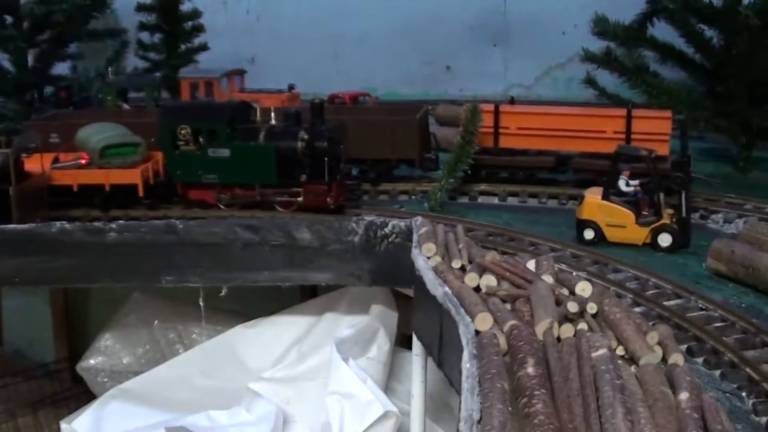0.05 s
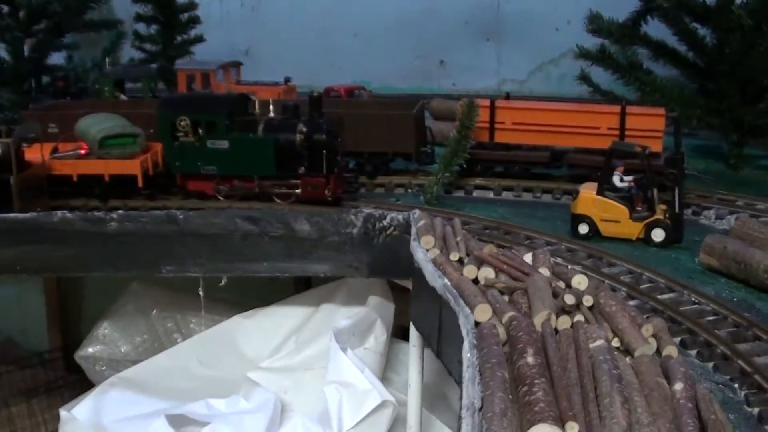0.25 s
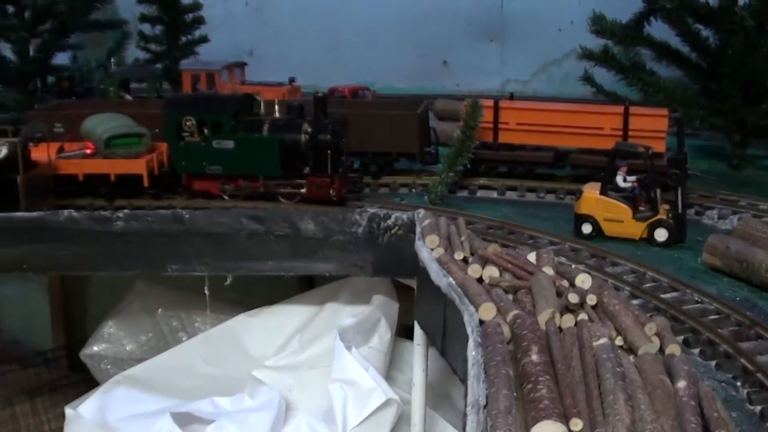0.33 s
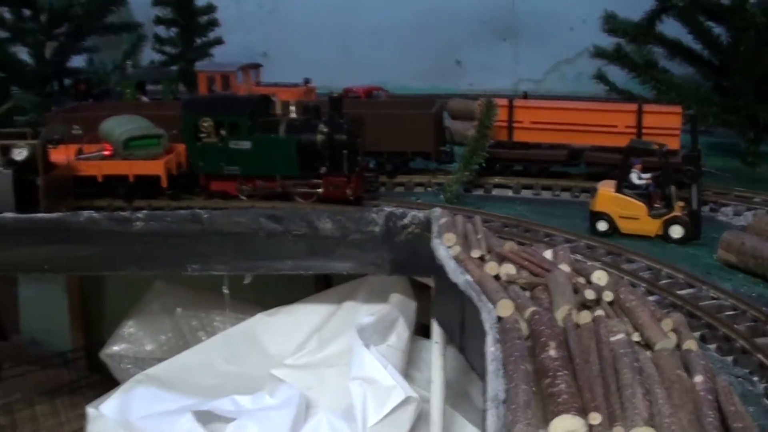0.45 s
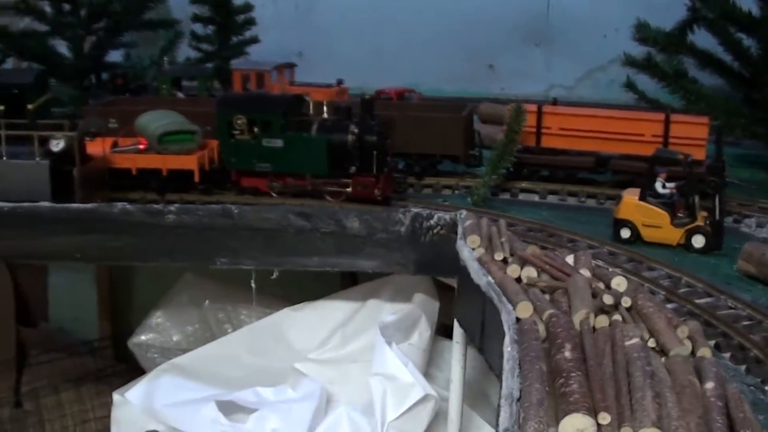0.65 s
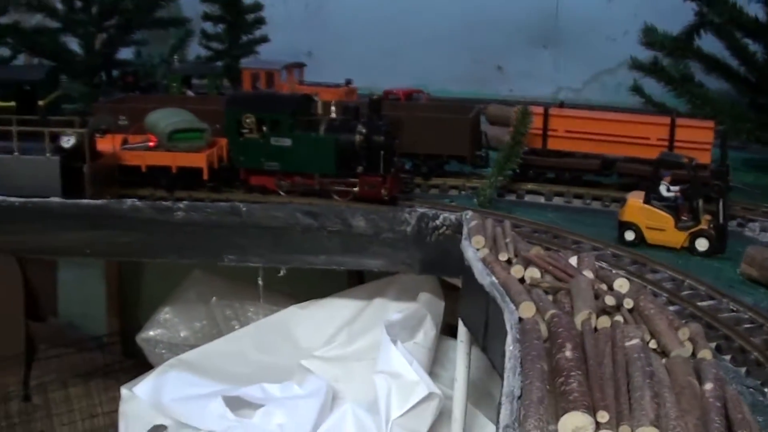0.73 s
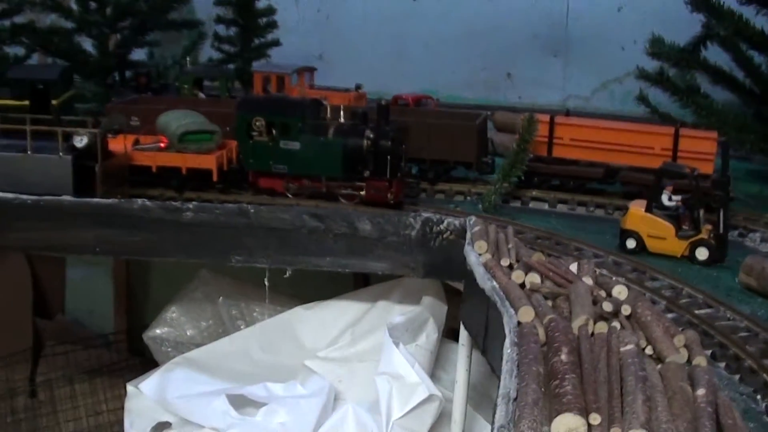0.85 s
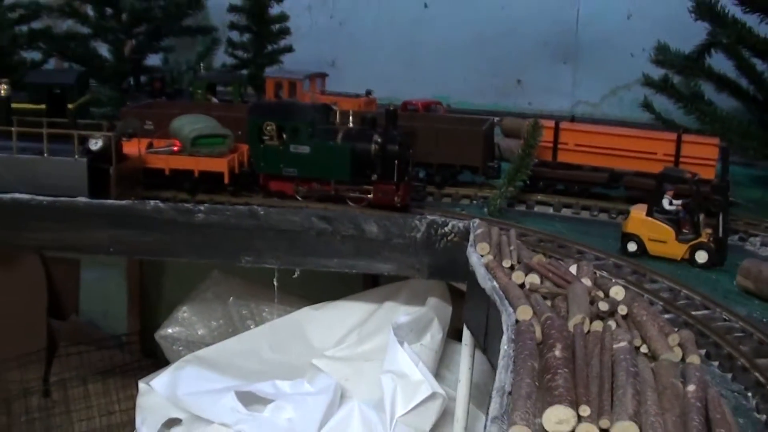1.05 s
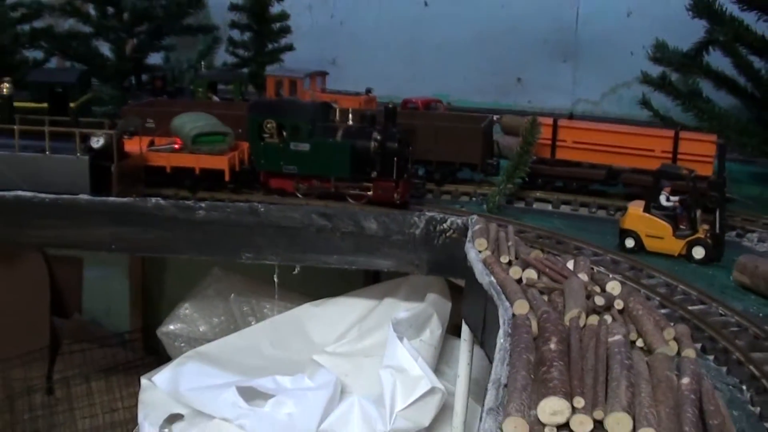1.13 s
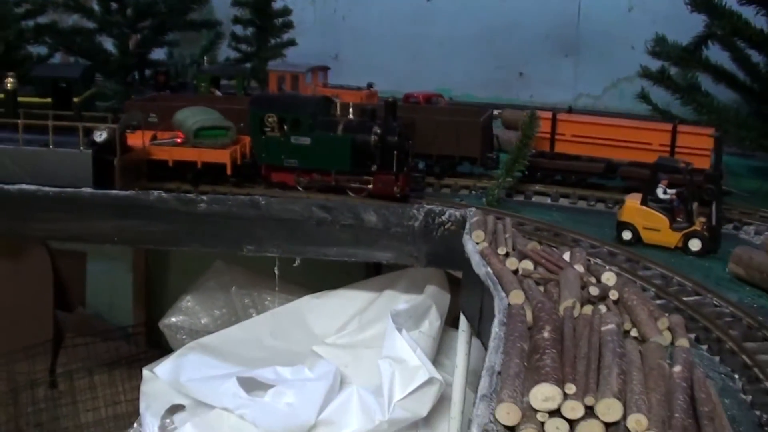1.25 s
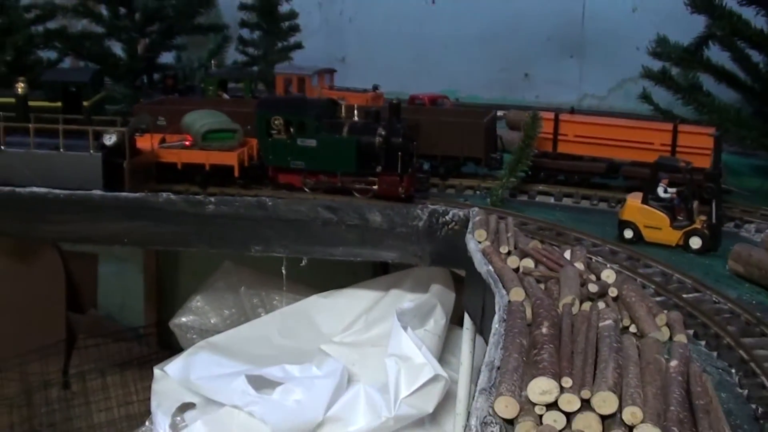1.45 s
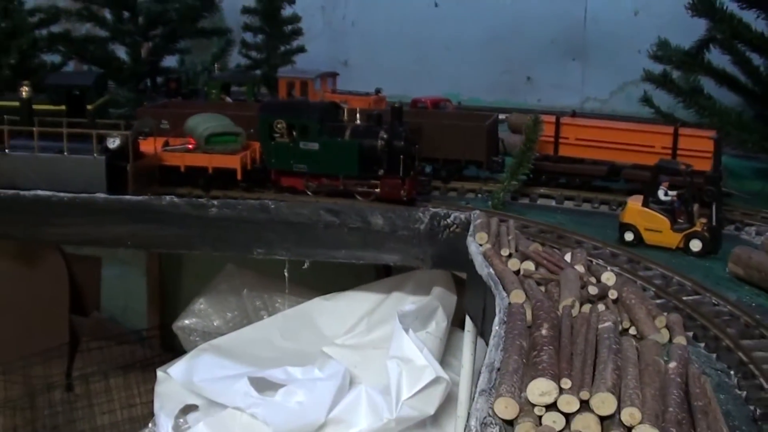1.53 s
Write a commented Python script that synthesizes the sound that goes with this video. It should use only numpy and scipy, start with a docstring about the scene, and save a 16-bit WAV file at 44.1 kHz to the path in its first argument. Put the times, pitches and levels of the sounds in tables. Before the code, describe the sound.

Three shrill, airy whistle blasts from a small steam engine, with faint hiss and wheel rumble.

```python
"""Model steam locomotive whistling indoors

Three breathy whistle blasts, the last one long and wavering: the pitch rises and sags with the steam,
and the hiss rings the whistle's pipe. Underneath, wheels roll and click, and steam leaks and spits once.
The room holds each note, and a limiter ducks everything under the blasts."""
import sys
import numpy as np
from scipy import signal
from scipy.fft import rfft, irfft
from scipy.io import wavfile
from scipy.ndimage import uniform_filter1d

SR = 44100
rng = np.random.default_rng(int(sys.argv[2]) if len(sys.argv) > 2 else 0)


def store_pcm(level_fs):
    """Save levels as 16-bit WAV."""
    pcm = np.round(np.clip(level_fs, -1, 1) * 32767).astype(np.int16)
    wavfile.write(sys.argv[1], SR, np.atleast_2d(pcm).T)


N = 70560
T = np.arange(N) / SR

# Stereo width of diffuse sound. Each row: frequency in Hz, side level in dB.
STEREO_WIDTH = [(150, -24.5), (700, -15.5), (1500, -14), (3100, -10.5), (5000, -10), (8000, -7),
                (12000, -29), (16000, -26)]
# Bright hiss of the leak and of each wheel impact. Each row: frequency in Hz, level in dB.
HISS_SPECTRUM = [(500, -24), (2700, -14), (3500, -8.5), (4400, -1), (5600, -7.5), (6800, -5.5), (8300, -3),
                 (9500, -8.5), (11000, -9), (13000, -16.5), (15800, -19.5)]
WHISTLE_PAN_DB, TRACK_PAN_DB = -2, 1


def amp(db):
    """Decibels to gain."""
    return 10 ** (np.asarray(db) / 20)


def unit(x):
    """Scales to rms 1."""
    return x / np.sqrt(np.mean(x ** 2) + 1e-20)


def curve(points):
    """Joins (seconds, value) points by straight lines."""
    return np.interp(T, *np.transpose(points))


def read(points, hz):
    """Reads (Hz, value) points on a log-frequency axis."""
    f, value = np.transpose(points)
    return np.interp(np.log(hz + 1), np.log(f + 1), value)


def colour(x, spectrum, peaks=()):
    """Equalises by a spectrum, with optional resonant peaks."""
    hz = np.fft.rfftfreq(N, 1 / SR)
    peaks_db = sum(lift / (1 + (2 * (hz - f) / width) ** 2) for f, width, lift in peaks)
    return irfft(rfft(x) * amp(read(spectrum, hz) + peaks_db), N)


def noise(spectrum, peaks=()):
    """Coloured noise of rms 1."""
    return unit(colour(rng.standard_normal(N), spectrum, peaks))


def wander(rate_hz):
    """Random motion of rms 1, rolling off above the given rate."""
    hz = np.fft.rfftfreq(N, 1 / SR)
    return unit(irfft(rfft(rng.standard_normal(N)) / (1 + (hz / rate_hz) ** 2), N))


def strike(start, decay_s, rise_s=.0005):
    """Envelope of a hit: quick rise, exponential fall."""
    age = np.maximum(T - start, 0)
    return np.minimum(age / rise_s, 1) * np.exp(-age / decay_s)


def pan(x, db):
    """Leans a sound to the left by db."""
    return x * amp([[db / 2], [-db / 2]])


def room(x, wet_db):
    """Direct sound plus, after a short gap, a diffuse tail with a narrow stereo image."""
    # Reverb time. Each row: frequency in Hz, seconds to fall 60 dB.
    decay_times = [(150, 0.54), (1000, 0.3), (3100, 0.34), (6300, 0.44), (10000, 0.18), (16000, 0.25)]
    gap_s = 0.0058
    hz, t, bands = signal.stft(rng.standard_normal((2, SR)), SR, nperseg=256)
    tails = signal.istft(bands * amp(-60 * t / read(decay_times, hz)[:, None]), SR, nperseg=256)[1]
    tails *= np.clip(np.arange(tails.shape[1]) / SR / gap_s - 1, 0, 1)
    mid, side = (unit(signal.fftconvolve(x, tail)[:N]) * np.std(x) * amp(wet_db) for tail in tails)
    side = colour(side, STEREO_WIDTH)
    return x + mid + np.array([side, -side])


def rolling():
    """Wheels rumble unevenly along the track, which adds a faint whirr."""
    # Colour of the rumble. Each row: frequency in Hz, level in dB.
    rumble = [(25, -30), (50, -29), (95, -9.5), (140, 1), (210, 1.5), (300, -1), (600, -2), (850, -3.5),
              (1150, 1), (1450, -9), (2300, -19.5), (3500, -60), (15000, -45)]
    # Track resonance. Each row: frequency in Hz, width in Hz, lift in dB.
    whirr = [(1192, 94, 3.5)]
    # Envelope of the rumble. Each row: time in seconds, level in dB.
    levels = [(0, -30.5), (.18, -32.5), (.32, -33), (.44, -28), (.52, -35.5), (.58, -39), (.72, -37.5),
              (.88, -40.5), (.97, -44), (1.18, -38), (1.35, -44), (1.45, -42.5), (1.53, -39.5), (1.6, -48)]
    mid = noise(rumble, whirr)
    side = colour(noise(rumble, whirr), STEREO_WIDTH) * amp(-2)
    gain = amp(curve(levels) + 2.0 * wander(rate_hz=36))
    return pan(np.array([mid + side, mid - side]) * gain, TRACK_PAN_DB)


def running_gear():
    """Rail joints knock the wagon into ringing; rods and couplings tick."""
    # Wheels hitting joints. Each row: start in seconds, level in dB.
    knocks = [(0.013, -30.5), (0.045, -27.5), (0.119, -31.5), (0.169, -32.5), (1.485, -25.5),
              (1.533, -19.5)]
    # The wagon's ring. Each row: frequency in Hz, level in dB, seconds to fall 60 dB.
    wagon_modes = [(594, -13.5, .08), (930, -8.5, 0.054), (1129, -3, 0.048), (1760, -15, 0.074),
                   (3740, -1.5, 0.035), (4770, -9, .03), (7500, -8.5, 0.035), (8420, 0, 0.021)]
    # Light metal ticks. Each row: start in seconds, level in dB.
    ticks = [(.047, -25.5), (.059, -34), (1.389, -36), (1.459, -31), (1.527, -28.5)]
    # Colour of a tick. Each row: frequency in Hz, level in dB.
    tick_spectrum = [(300, -33), (3000, -26), (6000, -2), (8700, 6), (12000, -3), (15800, -18)]
    clatter = np.zeros(N)
    for start, db in knocks:
        ring = np.zeros(N)
        for hz, mode_db, t60 in wagon_modes:
            envelope = amp(mode_db) * strike(start, t60 / np.log(1000))
            ring += envelope * np.sin(2 * np.pi * (hz * T + rng.random()))
        impact = amp(-2) * strike(start, decay_s=0.0031) * noise(HISS_SPECTRUM)
        clatter += amp(db) * (ring + impact)
    clatter += noise(tick_spectrum) * sum(amp(db) * strike(start, decay_s=0.0049) for start, db in ticks)
    return pan(room(clatter, wet_db=-9), TRACK_PAN_DB)


def steam():
    """Steam leaks throughout; one wet spit swells and cracks just before the second blast."""
    # Envelope of the leak. Each row: time in seconds, level in dB.
    leak_levels = [(0, -34.5), (.18, -35.5), (.42, -30.5), (.7, -39.5), (1.22, -36), (1.35, -41.5),
                   (1.48, -44), (1.585, -42), (1.593, -29.5), (1.6, -52)]
    # Colour of the spit. Each row: frequency in Hz, level in dB.
    spit_spectrum = [(60, -37), (200, -3), (800, -1.5), (1300, 4.5), (2300, 3), (4000, -2.5), (8000, -2.5),
                     (11000, -19), (15800, -28)]
    # Cracks within the spit. Each row: start in seconds, level in dB.
    cracks = [(.487, -5.5), (0.502, -8.5)]
    peak_s, rise_s, fall_s = 0.497, 0.039, 0.013
    leak = noise(HISS_SPECTRUM) * amp(curve(leak_levels) + 0.73 * wander(rate_hz=100))
    swell = np.exp(np.minimum((T - peak_s) / rise_s, (peak_s - T) / fall_s))
    sputter = amp(-21 + 1.2 * wander(rate_hz=520))
    crackle = sum(amp(db) * strike(start, decay_s=0.00085, rise_s=0.00022) for start, db in cracks)
    spit = (sputter * swell + crackle) * noise(spit_spectrum)
    return room(leak + spit, wet_db=-7)


def whistle():
    """Steam sounds a wavering pipe tone, fuzzy with turbulence, and hisses through the resonances."""
    # One list per blast. Each row: time in seconds, pitch in Hz, tone level in dB, breath level in dB.
    blasts = [
        [(.203, 3060, -18, -14), (.222, 3190, -9.5, -18), (.243, 3060, -12, -22.5), (.275, 2940, -19, -18.5),
         (.34, 2995, -10, -20), (.365, 3185, -8, -14), (.378, 3158, -6.5, -12), (.39, 3006, -9.5, -35)],
        [(.507, 3149, -5.5, -16.5), (.525, 3172, -11, -12.5), (.55, 3112, -5, -20.5), (.58, 3066, -8.5, -15.5),
         (.612, 3174, -6.5, -20.5), (.642, 3191, -9.5, -12.5), (.652, 3071, -8, -18), (.662, 2816, -20, -48)],
        [(.736, 3090, -3.5, -17), (.755, 3180, -8.5, -14.5), (.805, 3028, -11.5, -25.5),
         (.84, 2939, -14.5, -23.5), (.884, 2917, -20.5, -22.5), (.905, 3130, -6.5, -18),
         (.95, 3195, -8.5, -18.5), (.995, 3164, -5, -18.5), (1.022, 3102, -9.5, -19), (1.042, 2942, -6, -27.5),
         (1.075, 2906, -14, -22.5), (1.1, 2906, -11.5, -24.5), (1.132, 2995, -12, -20), (1.15, 3181, -4, -14.5),
         (1.17, 3207, -3, -18), (1.19, 3170, -16, -38)],
    ]
    # Faint overtones. Each row: multiple of the pitch, level in dB against a note at full_hz.
    harmonics = [(2, -21.5), (3, -21.5)]
    # Colour of the breath. Each row: frequency in Hz, level in dB.
    breath_spectrum = [(200, -52), (1500, -20.5), (2200, -13.5), (3700, -12), (4900, -13.5), (6800, -7.5),
                       (8200, -4), (9500, -2.5), (11200, -11), (13500, -13), (15800, -28.5)]
    # Pipe resonances. Each row: frequency in Hz, width in Hz, lift in dB.
    pipe_modes = [(2164, 300, 10), (3203, 410, 22.5), (4344, 266, 15.5), (5470, 370, 11), (6100, 180, 6),
                  (7520, 210, 2.5), (8090, 370, 5.5), (9340, 330, 4.5), (10490, 370, 7), (11800, 350, 7.5),
                  (14950, 450, 10)]
    attack_s, release_s = 0.0038, 0.0033
    lead_s, lead_db = 0.015, -10.5  # steam escapes just before the pipe speaks
    jitter, flutter_db, waver_hz = 0.00607, 1.0, 241
    fuzz_db, fuzz_width_hz = -22, 110
    full_hz, overtone_db_per_hz = 3100, 0.0327  # overtones fade as the pitch sags
    tone, overtones, breath = np.zeros((3, N))
    for blast in blasts:
        times, *columns = np.transpose(blast)
        hz, tone_db, breath_db = (np.interp(T, times, column) for column in columns)
        release = np.clip((times[-1] - T) / release_s + 1, 0, 1)
        gate = np.clip((T - times[0]) / attack_s, 0, 1) * release
        early_steam = np.clip((T - times[0] + lead_s) / attack_s, 0, 1) * release * amp(lead_db)
        flow = np.maximum(gate, early_steam)
        phase = 2 * np.pi * np.cumsum(hz * (1 + jitter * wander(waver_hz))) / SR
        # Turbulence: a narrow band of noise that follows the note.
        fuzz = wander(fuzz_width_hz) * np.sin(phase) + wander(fuzz_width_hz) * np.cos(phase)
        level = amp(tone_db + flutter_db * wander(waver_hz))
        envelope = np.sqrt(2) * level * gate
        tone += envelope * np.sin(phase) + level * flow * amp(fuzz_db) * fuzz
        brightness_db = overtone_db_per_hz * (hz - full_hz)
        overtones += envelope * sum(amp(db + brightness_db) * np.sin(k * phase) for k, db in harmonics)
        breath += flow * amp(breath_db)
    hiss = breath * noise(breath_spectrum, pipe_modes) * amp(1.6 * wander(rate_hz=130))
    return pan(room(tone, wet_db=-2), WHISTLE_PAN_DB) + room(hiss + overtones, wet_db=-8)


def scene():
    """The whistle over a bed of rumble, steam and clatter."""
    return whistle() + rolling() + steam() + running_gear()


def record(dry):
    """A fast limiter with a slow recovery ducks the mix; a low-pass trims the top."""
    threshold_db, slope, recovery_db_per_s, cutoff_hz = -11, 0.76, 47, 15800
    power = abs(uniform_filter1d((dry ** 2).mean(0), size=90))
    power_db = 10 * np.log10(power + 1e-12)
    fall_db = T * recovery_db_per_s
    held_db = np.maximum.accumulate(power_db + fall_db) - fall_db
    over_db = np.maximum(held_db - threshold_db, 0)
    limited = dry * amp(-slope * uniform_filter1d(over_db, size=60))
    lowpass = signal.firwin(511, cutoff_hz, window=("kaiser", 9), fs=SR)
    return signal.oaconvolve(limited, lowpass[None], "same")


dry = scene()
out = record(dry)
store_pcm(out)
```